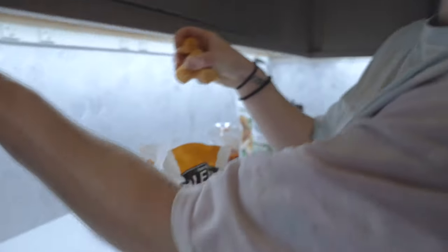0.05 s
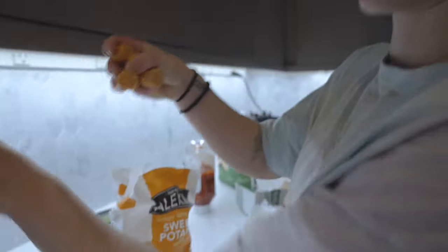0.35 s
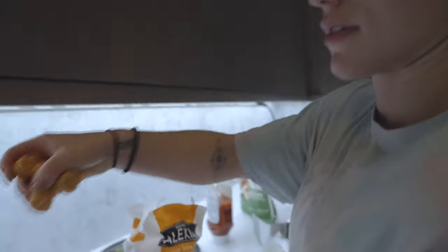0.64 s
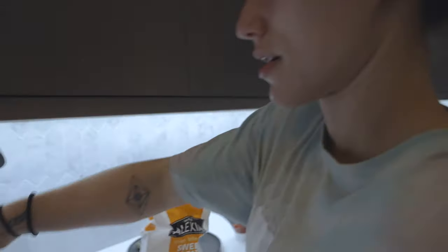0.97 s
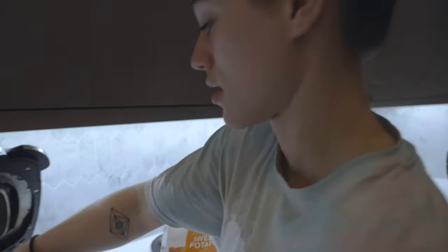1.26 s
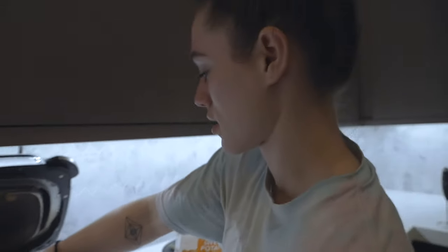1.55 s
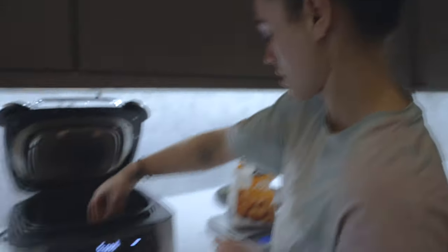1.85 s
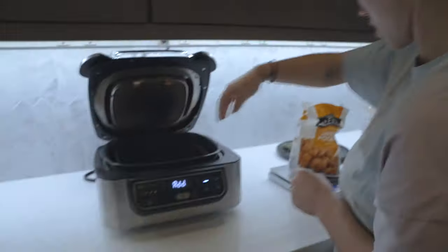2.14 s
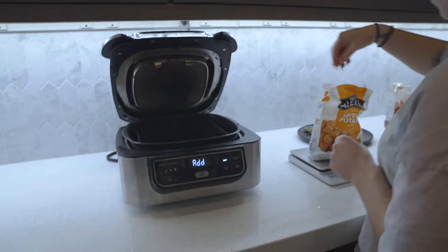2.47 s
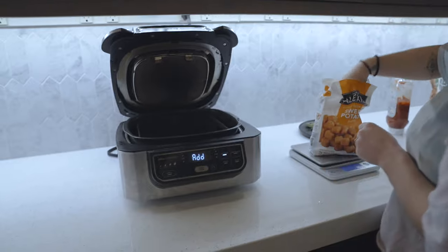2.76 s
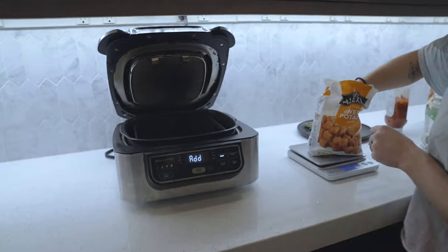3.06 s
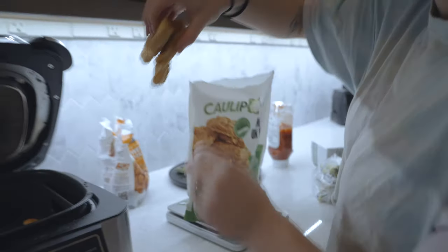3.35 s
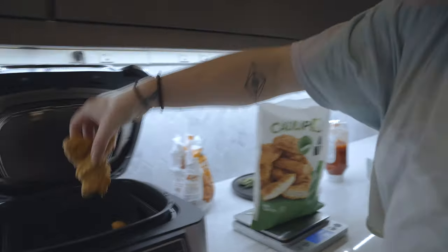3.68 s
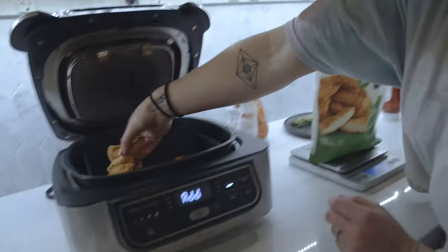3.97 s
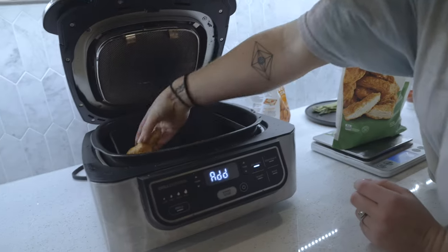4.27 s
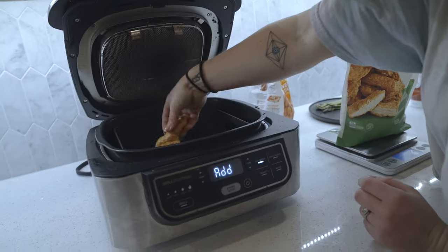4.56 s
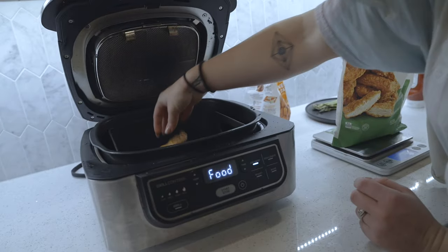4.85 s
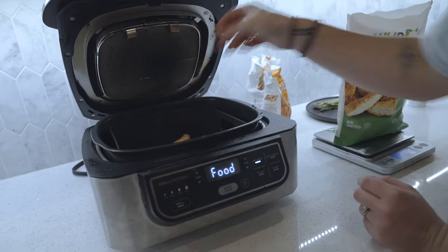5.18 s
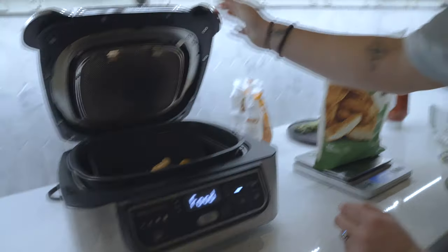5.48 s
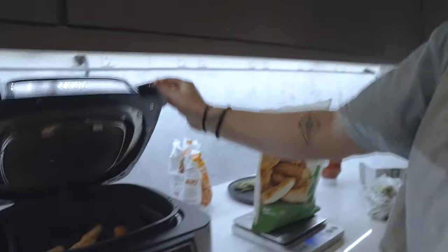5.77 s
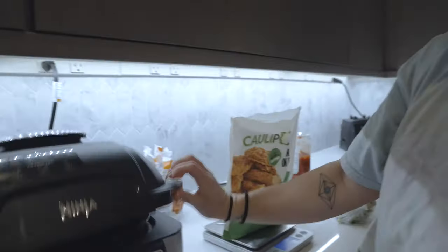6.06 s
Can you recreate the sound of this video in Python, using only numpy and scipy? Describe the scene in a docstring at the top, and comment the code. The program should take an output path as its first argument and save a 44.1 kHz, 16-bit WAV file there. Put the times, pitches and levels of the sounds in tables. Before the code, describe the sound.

Frozen pieces clatter into a hot air fryer basket and sizzle softly, with plastic bag crackles and a squeaky lid hinge.

```python
"""Frozen food in an air fryer

Frozen breaded pieces drop into the hot basket of an open air fryer in a small kitchen. The basket
rings, and frost boils off in a sizzle while the fan runs down and a hand rustles a plastic bag.
Then the sound jumps to a second scene with the fan still: more pieces land and sizzle,
and the lid scrapes down on its squeaky hinge."""
import sys
import numpy as np
from scipy import signal
from scipy.fft import rfft, irfft, next_fast_len
from scipy.io import wavfile
from scipy.ndimage import uniform_filter1d

SR = 44100
rng = np.random.default_rng(int(sys.argv[2]) if len(sys.argv) > 2 else 0)


def dump(signal):
    """Clip the signal to [-1, 1] and save it as 16-bit WAV at the path in sys.argv[1]."""
    limited = np.clip(np.atleast_2d(signal).T, -1, 1)
    pcm = np.round(limited * 32767).astype(np.int16)
    wavfile.write(sys.argv[1], SR, pcm)


N = 269847
TIME = np.arange(N) / SR
SECOND_SCENE_S = 3.134

# food hits the basket: (time [s], relative level [dB], contact time [s], dull above [Hz],
# bass boost [dB], ringing [dB], place [0 middle to 1 edge])
LANDINGS = [(1.381, -24.5, 0.015, 4200, -13.5, 0.5, 0), (1.412, -34, 0.0046, 2600, 1, 7, 0.4),
            (1.435, -39.5, 0.014, 2000, -4, 4, 0.055), (1.480, -36, 0.0056, 3000, 5, -9, 0.75),
            (1.498, -33.5, 0.002093, 1430, -7, 1, 0.2), (1.521, -38, 0.0044, 3220, -15, 3.5, 0),
            (1.566, -36, 0.0084, 3200, -2, 1, 0.28), (1.625, -43, 0.01, 1210, 7, 5.5, 0),
            (1.706, -36.5, 0.011, 2170, -2, 2, 0.34), (1.739, -29.5, 0.01, 2120, -8, -0.5, 0.07),
            (1.785, -39.5, 0.012, 3000, 11, 3, 0.19), (1.818, -35.5, 0.02, 1750, -1.5, -2.5, 0.00082),
            (1.933, -43, 0.0028, 5000, -7, 3, 0.57), (4.189, -47.5, 0.01, 1800, 39.5, 3, 0.83),
            (4.276, -22.5, 0.0028, 3420, -2.5, -1, 0.36), (4.291, -22, 0.0089, 3200, 1, -3, 0.64),
            (4.308, -26, 0.0078, 5500, -0.5, -5.5, 0.72), (4.361, -34.5, 0.016, 2200, 17, -1, 0.89),
            (4.383, -28, 0.0089, 2350, -1, -5, 0.4), (4.422, -37, 0.017, 1100, 16, -10, 0.93),
            (4.778, -19.5, 0.0013, 7000, -4, -0.5, 1), (4.926, -18.5, 0.017, 2820, 0.5, -5, 0.97),
            (5.038, -31.5, 0.0052, 3500, 0, 6.5, 0.65), (5.045, -26, 0.007, 2700, 9, -5, 1),
            (5.090, -27.5, 0.0046, 1560, 7, -17, 0.93), (5.220, -55, 0.00895, 3500, 1, 6, 1)]
# the basket's tones; a ring time is how long a sound takes to fade by 60 dB:
# (pitch [Hz], level if hit in the middle [dB], level if hit at the edge [dB], ring time [s])
BASKET_TONES = [(248.9, -10, -14.5, 0.88), (321.2, -13, -4.5, 0.63), (432.3, 2, -12, 0.28),
                (502, -12, -2, 0.25), (635.3, -1, -2.5, 0.19), (689, -5, -15, 0.41), (751, -0.5, -4, 0.11),
                (843, -3, -15, 0.22), (1059, -3.5, -12, 0.19), (1380, -6, 2.5, 0.093),
                (1420, -5.5, -15, 0.39), (1639, -9, 2.5, 0.088), (1750, -17, -21, 0.21),
                (1865, 1, -37, 0.28), (2028, -23.5, 8.5, 0.074), (2304, -25.5, -18, .11),
                (2382, -16.5, 1, 0.15), (2777, -6.5, -4.5, 0.08), (3010, -22, -5, 0.2),
                (3390, -7, -14, 0.11), (3480, -22.5, 2, 0.062), (3960, -35.5, 1, .14),
                (3500, -23, -4, 0.11), (4190, -22, -3.5, .1)]
# tone colours of noises: (frequency [Hz], relative level [dB])
CLATTER_COLOUR = [(35, -32), (65, -1), (100, -12.5), (200, -3.5), (400, 3), (700, 1), (980, -5),
                  (1220, -8.5), (1600, -1.5), (2400, -7.5), (3800, -5.5), (5200, -13), (8000, -20.5),
                  (16000, -33.5)]  # basket and housing
SIZZLE_COLOUR = [(200, -19), (800, 6.5), (2000, 5), (2900, 2.5), (3300, 11), (3550, 4), (3900, 8),
                 (4300, 0), (5200, -2), (8000, -1), (10500, -1.5), (13000, 0), (16000, -1)]
FAN_COLOUR = [(30, 0), (70, -4), (140, 1), (230, 0.5), (370, 6.5), (520, 0.5), (660, -5.5), (1300, -3),
              (2100, 1.5), (2550, -1.3), (3900, 0.5), (5000, -5.5), (7500, -19.5), (16000, -42)]
SLEEVE_COLOUR = [(40, -51), (110, 1.5), (300, -2.5), (600, -12.5), (2000, -37), (16000, -51)]
SCRAPE_COLOUR = [(100, -18), (400, 10.5), (950, 2), (1400, 5.5), (1750, -8.5), (2150, 2.5), (2600, -8.5),
                 (4100, -2), (5200, -11.5), (10000, -36), (16000, -58)]
BAG_COLOUR = [(300, -34), (1500, -9.5), (4000, 5.5), (5500, -9), (9000, -6), (16000, -21)]
ROOM_COLOUR = [(40, -4.5), (80, -7.5), (120, -3.5), (180, -17.5), (450, -14), (800, -26), (1400, -32),
               (2500, -36), (3700, -30.5), (5200, -38.5), (9000, -45), (12000, -41), (16000, -49.5)]
RUMBLE_COLOUR = [(2, -36), (8, -1.5), (13, -2), (22, -10), (32, -17), (60, -39.5), (200, -63),
                 (16000, -120)]
# how long the clatter and the room's echo last: (frequency [Hz], ring time [s])
CLATTER_RING = [(60, 0.49), (300, 0.13), (1000, 0.11), (3000, 0.094), (6000, 0.032), (16000, 0.019)]
ROOM_RING = [(100, 0.2), (500, 0.85), (2000, 0.24), (4000, 0.39), (12000, 0.47)]
# bag and crust snap: (time [s], level [dB], decay time [s], centre [Hz], width [octaves])
BAG_AND_CRUST_SNAPS = [(1.381, -45, 0.0028, 10100, 0.27), (1.522, -48, 0.0071, 5000, 0.3),
                       (1.740, -47, 0.01, 6500, 0.32), (1.819, -49, 0.013, 4970, 0.3),
                       (1.934, -41, 0.012, 3170, 0.3), (2.720, -43.5, .0053, 2500, .76),
                       (2.884, -41.5, .005, 2340, .67), (3.006, -50, 0.001672, 11000, .6),
                       (3.057, -39, 0.011, 1092, 0.76), (3.066, -27.5, 0.002, 3240, 0.69),
                       (3.093, -39, .009, 2880, 0.57), (3.099, -40.5, .0082, 920, 0.31),
                       (3.518, -61.5, .003, 11000, 0.904), (3.581, -55, 0.011, 217, 0.49),
                       (3.637, -58.5, 0.0034, 6000, 3.5), (3.960, -64, 0.0019, 11000, .6),
                       (4.103, -64, .0032, 9001, .9), (4.190, -58.5, 0.016, 3500, .5),
                       (4.276, -44, 0.0028, 11000, 1), (4.293, -48, 0.00322, 7400, .41),
                       (4.309, -38.5, 0.00237, 7398, 1.1), (4.554, -39, 0.0036, 11200, .71),
                       (4.677, -47, 0.006, 3900, 0.68), (4.778, -17.5, 0.0097, 3460, 0.24),
                       (5.038, -27, 0.0055, 3160, 0.15), (5.298, -45, .005, 10000, 0.81),
                       (6.096, -46, 0.0097, 2370, 0.6)]
# sounds that swell and fade: (start [s], rise [s], hold [s], fade [dB per s], level [dB])
FROST_BOILS = [(1.41, 0.16, .02, 58, -61), (1.676, 0.075, 1.18, 14, -57), (1.825, 0.19, 0.29, 37, -52),
               (4.29, 0.084, .02, 11, -55.5), (4.524, 0.41, 0.87, 15, -52)]
STEAM_PUFFS = [(1.9, .22, 0.33, 42, -62.5), (4.53, .08, 0.13, 54, -60), (4.85, 0.36, 0.33, 45, -59.5)]
LID_SCRAPE = (5.5, .16, -0.15, 19, -52)  # a negative hold starts the fade during the rise
# spells of spitting and of bag crumpling: (middle [s], half length [s], level [dB])
SPIT_SPELLS = [(2.3, 0.38, -60), (3.45, 0.43, -78), (3.9, 0.12, -71), (4.24, 0.05, -59),
               (4.394, 0.047, -41), (4.85, 0.24, -52.5)]
BAG_CRUMPLES = [(2.783, 0.022, -49.5), (3.35, 0.22, -79.5)]
# the air duct's resonances: (frequency [Hz], width [Hz], boost [dB])
DUCT_PEAKS = [(452, 39, 7.5), (1021, 230, 9.7), (1700, 190, 3.7), (2020, 51, 5.1), (3002.7, 45, 7.3),
              (3840, 310, 3.9)]
# the hinge catches: (middle [s], half length [s], main tone [dB], overtones [dB])
HINGE_SQUEAKS = [(5.483, 0.037, -52, -42.5), (5.573, 0.041, -54, -55), (5.615, 0.031, -56, -53.5),
                 (5.68, 0.035, -50, -58), (5.828, .02, -54, -73)]
# the squeak's overtones: (pitch [times the main tone], relative level [dB])
HINGE_OVERTONES = [(1.5, -13), (2, -3.5), (2.5, -8), (3, -3), (4, -15), (5, -25)]
# sleeve and hand slide: (middle [s], half length [s], soft rub [dB], dry scrape [dB])
HAND_STROKES = [(2.767, 0.062, -55.5, -72), (2.966, 0.17, -61, -70), (3.1, 0.026, -47.5, -48.5),
                (3.496, 0.32, -73.5, -76), (4.595, 0.45, -64, -63.5), (5.226, 0.36, -56.5, -61.5),
                (5.59, 0.084, -61, -53), (5.777, 0.049, -54.5, -74), (6.01, 0.1, -66, -61)]


def knock(db, contact_s, hard_hz, thud_db, ring_db, place, thud_hz=500, size=24000):
    """The crust crunches on the plate, then the basket rings out; soft blows have less treble."""
    t = np.arange(size) / SR
    age = np.maximum(t - contact_s, 0)
    blow = lambda hz: amp(thud_db / (1 + (hz / thud_hz) ** 2)) / np.sqrt(1 + (hz / hard_hz) ** 3)
    clatter = unit(colour(rng.standard_normal(size), lambda hz: amp(read(CLATTER_COLOUR, hz)) * blow(hz)))
    hz, middle_db, edge_db, ring_s = np.transpose(BASKET_TONES)[:, :, None]
    strength = amp(middle_db + place * (edge_db - middle_db)) * blow(hz)
    rattle = 0.009 * np.cumsum(rng.standard_normal((len(hz), size)), 1) / np.pi
    turns = hz * t + rng.random(hz.shape) + rattle  # the rattling piece blurs each tone
    tones = strength * np.exp(-np.log(1000) * age / ring_s) * np.sin(2 * np.pi * turns)
    ring = tones.sum(0) / np.sqrt(np.sum(strength ** 2) / 2)
    ring *= np.minimum(2 * t / contact_s, 1)  # builds up during contact
    sound = fade(clatter, age, CLATTER_RING) + amp(ring_db) * ring
    bass = colour(sound, lambda hz: 1 / (1 + (hz / 900) ** 2))
    sound -= bass * np.exp(-t / 0.002)  # the heavy housing takes longer to move
    attack = 1 - np.exp(-t / 0.00049)
    return amp(db - 3.5) * attack * sound


def snap(db, decay_s, centre_hz, octaves, rise_s=0.0003, size=6000):
    """A fold of plastic or a crumb gives way in a short burst of noise."""
    t = np.arange(size) / SR
    hump = lambda hz: 1 / (1 + (np.log2((hz + 1) / centre_hz) / octaves) ** 2)
    dying = np.exp(-t / decay_s)
    burst = colour(rng.standard_normal(size), hump) * dying * (1 - np.exp(-t / rise_s))
    return amp(db) * burst * np.linalg.norm(dying) / np.linalg.norm(burst)


def sizzle(pops_per_s=6000, spread_db=2.5, wash=0.62, patchy_db=2.3, idle_db=-83.5):
    """Frost on hot metal boils in thousands of tiny pops; small vents come and go and colour the hiss."""
    pops = rng.standard_normal(N) * (rng.random(N) < pops_per_s / SR)
    pops *= amp(spread_db * np.minimum(rng.exponential(1, N), 6))
    hz, _, bands = signal.stft(unit(pops) + wash * rng.standard_normal(N), SR, nperseg=512)
    vents = uniform_filter1d(rng.standard_normal(bands.shape), 3, axis=0)  # smooth over frequency
    vents = unit(uniform_filter1d(vents, 18, axis=1))  # and over time
    bands *= amp(read(SIZZLE_COLOUR, hz)[:, None] + patchy_db * vents)
    hiss = signal.istft(bands, SR, nperseg=512)[1][:N]
    return together([swell(*row) for row in FROST_BOILS] + [amp(idle_db)]) * unit(hiss)


def spits(per_s=80, spread_db=5.0, decay_s=0.0013):
    """Single spits and crumbs tick at random, with the tone colour of the sizzle."""
    ticks = rng.random(N) < per_s / SR
    strength = amp(spread_db * (np.minimum(rng.exponential(1, N), 3) - 1.5))
    bursts = signal.fftconvolve(ticks * strength, np.exp(-TIME[:600] / decay_s))[:N]
    return together(stroke(*row) for row in SPIT_SPELLS) * bursts * noise(SIZZLE_COLOUR)


def steam(first_hz=15787, last_hz=13300, sink_at_s=4.65, settle_s=0.3, width_hz=1300, stray_hz=300):
    """Puffs of steam add two high bands of hiss that wander and, late on, sink in pitch."""
    def band(centre_hz):
        stray = unit(colour(rng.standard_normal(N), lambda hz: 1 / (1 + (hz / 14) ** 4)))
        angle = 2 * np.pi * np.cumsum(centre_hz + stray_hz * stray) / SR
        return unit(flutter() * np.cos(angle) + flutter() * np.sin(angle))

    flutter = lambda: unit(colour(rng.standard_normal(N), lambda hz: 1 / (1 + (2 * hz / width_hz) ** 2)))
    age = np.maximum(TIME - sink_at_s, 0)
    upper_hz = last_hz + (first_hz - last_hz) * np.exp(-age / settle_s)
    hiss = band(upper_hz) + amp(-3) * band(0.84 * upper_hz)
    return together(swell(*row) for row in STEAM_PUFFS) * hiss


def fan(coast_db=-46.5, sink_db_per_s=1.5, extra_db=4, drop_s=0.44, treble_hz=3500):
    """Air rushes through the duct; the fan slows quickly, then coasts, and its treble fades fastest."""
    duct_db = lambda hz: sum(db / (1 + (2 * (hz - peak) / width) ** 2) for peak, width, db in DUCT_PEAKS)
    air = unit(colour(noise(FAN_COLOUR), lambda hz: amp(duct_db(hz))))
    low = colour(air, lambda hz: 1 / (1 + (hz / treble_hz) ** 8))
    level_db = coast_db - sink_db_per_s * TIME + extra_db * np.exp(-TIME / drop_s)
    treble_db = 3 + 0.99 * (level_db + 42)
    return amp(level_db) * (low + (air - low) * amp(treble_db))


def hinge(pitch_hz=1424, jitter=0.0146, flutter_db=3.0):
    """The lid hinge sticks and slips; every other slip differs, which adds in-between overtones."""
    main_gain = together(stroke(s, half, db) for s, half, db, _ in HINGE_SQUEAKS)
    overtone_gain = together(stroke(s, half, db) for s, half, _, db in HINGE_SQUEAKS)
    angle = 2 * np.pi * np.cumsum(pitch_hz * (1 + jitter * wobble(130))) / SR
    overtones = sum(amp(db) * np.sin(ratio * angle) for ratio, db in HINGE_OVERTONES)
    return amp(flutter_db * wobble(130)) * (main_gain * np.sin(angle) + overtone_gain * overtones)


def rubbing(grip_db=2.34, crinkle_db=1.5):
    """Cloth, plastic and lid slide with an uneven grip; the bag crinkles in finer grains."""
    soft = together(stroke(s, half, db) for s, half, db, _ in HAND_STROKES)
    scrape = together([stroke(s, half, db) for s, half, _, db in HAND_STROKES] + [swell(*LID_SCRAPE)])
    crumple = together(stroke(*row) for row in BAG_CRUMPLES)
    grip = amp(grip_db * wobble(400))
    folds = unit(amp(crinkle_db * wobble(50)))
    sliding = grip * (soft * noise(SLEEVE_COLOUR) + scrape * noise(SCRAPE_COLOUR))
    return sliding + crumple * folds * noise(BAG_COLOUR)


def bump(db=-30, low_hz=105, high_hz=190, rise_s=0.0075):
    """A dull bump: two low tones swell and die away at once."""
    t = TIME[:5000]
    tones = np.sin(2 * np.pi * low_hz * t) + amp(-8) * np.sin(2 * np.pi * high_hz * t)
    return amp(db) * (t / rise_s * np.exp(1 - t / rise_s)) ** 2 * tones


def kitchen_echo(sound, build_s=0.005):
    """The walls of a small room blur a sound into a short tail."""
    t = TIME[:26000]
    tail = fade(rng.standard_normal(len(t)), t, ROOM_RING) * np.minimum(t / build_s, 1)
    return signal.fftconvolve(sound, tail / np.linalg.norm(tail))[:N]


def room_air(hush_db=-65, rumble_db=-54, draught_db=-43, fade_db_per_s=7.5):
    """The kitchen's hush and the rumble of slowly moving air, stronger in the fan's dying draught."""
    hush = amp(hush_db) * noise(ROOM_COLOUR)
    draught = same_scene(0) * amp(draught_db - fade_db_per_s * TIME)
    return hush + together([amp(rumble_db), draught]) * noise(RUMBLE_COLOUR)


def amp(db):
    """Turns decibels into a gain."""
    return 10 ** (np.asarray(db) / 20)


def unit(x):
    """Scales a signal to an average power of 1."""
    return x / np.sqrt(np.mean(x ** 2) + 1e-30)


def read(table, hz):
    """Looks up a frequency in a table, sliding smoothly between rows."""
    row_hz, value = np.transpose(table)
    return np.interp(np.log(hz + 1), np.log(row_hz + 1), value)


def colour(x, gain):
    """Turns each frequency of x up or down by gain(frequency)."""
    size = next_fast_len(len(x))
    return irfft(rfft(x, size) * gain(np.fft.rfftfreq(size, 1 / SR)), size)[:len(x)]


def noise(table):
    """Steady noise with the given tone colour."""
    return unit(colour(rng.standard_normal(N), lambda hz: amp(read(table, hz))))


def wobble(samples):
    """A random wobble; smoothing over more samples makes it slower."""
    return unit(uniform_filter1d(rng.standard_normal(N), samples))


def fade(x, age, ring_times):
    """Lets each octave of x die away at its own speed."""
    centres = np.geomspace(60, 15000, 9)
    bands = (colour(x, lambda hz: read(np.c_[centres, share], hz)) for share in np.eye(9))
    return sum(band * np.exp(-np.log(1000) * age / read(ring_times, hz))
               for band, hz in zip(bands, centres))


def same_scene(s):
    """True throughout the scene that holds time s."""
    return (TIME < SECOND_SCENE_S) == (s < SECOND_SCENE_S)


def swell(start, rise, hold, fade_db_per_s, db):
    """A gain that rises, holds and dies away."""
    age = TIME - start
    level_db = db - fade_db_per_s * np.maximum(age - rise - hold, 0)
    return same_scene(start) * np.clip(age / rise, 0, 1) * amp(level_db)


def stroke(middle, half, db):
    """The gain of a movement that speeds up and slows down again."""
    return same_scene(middle) * amp(db) * np.exp(-((TIME - middle) / half) ** 2)


def together(gains):
    """The gain of unrelated sounds at once: their powers add."""
    return np.sqrt(sum(gain ** 2 for gain in gains))


def play(events, source):
    """Plays the source once for each row, at the time in its first column."""
    mix = np.zeros(N)
    for s, *settings in events:
        sound = source(*settings)
        part = mix[round(s * SR):][:len(sound)]
        part += sound[:len(part)]
    return mix


def scene(bump_at_s=0.851):
    """Two scenes at one counter; the fan and the first echoes stop when the second begins."""
    first = same_scene(0)
    knocks = play(LANDINGS, knock)
    snaps = play(BAG_AND_CRUST_SNAPS, snap)
    squeak = hinge()
    to_walls = amp(-15.5) * knocks + amp(-14) * snaps + amp(2.5) * squeak
    echo = first * kitchen_echo(to_walls * first) + kitchen_echo(to_walls * ~first)
    background = room_air() + first * fan()
    frying = sizzle() + spits() + steam()
    handling = squeak + rubbing() + play([(bump_at_s,)], bump)
    return (knocks + snaps + frying + handling + echo + background)[None]


def record(dry, top_hz=16000):
    """Takes away the very highest treble."""
    low_pass = signal.firwin(511, top_hz, window=("kaiser", 9), fs=SR)
    return signal.oaconvolve(dry, low_pass[None], "same")


dry = scene()
out = record(dry)
dump(out)
```